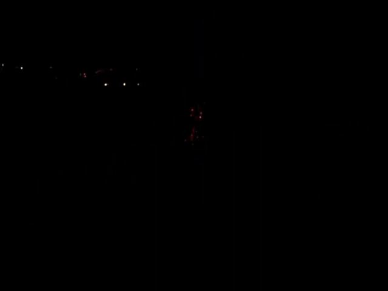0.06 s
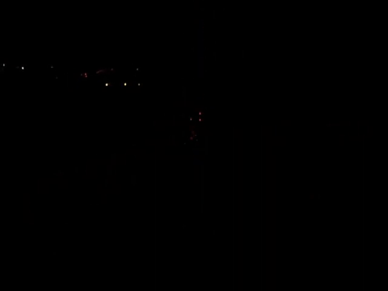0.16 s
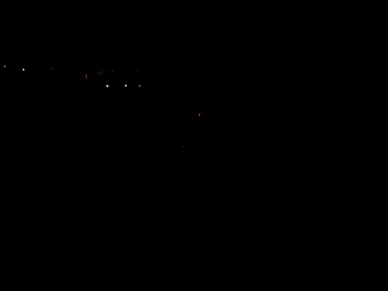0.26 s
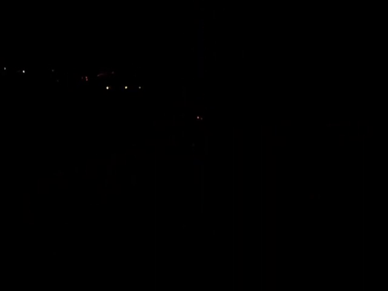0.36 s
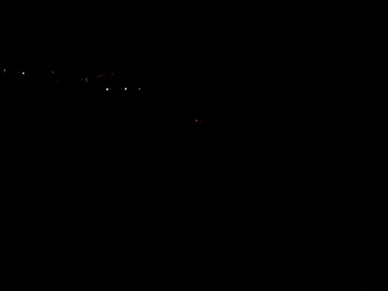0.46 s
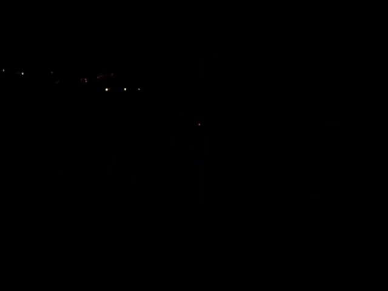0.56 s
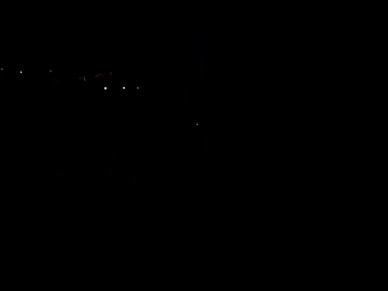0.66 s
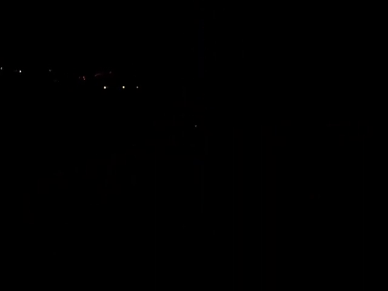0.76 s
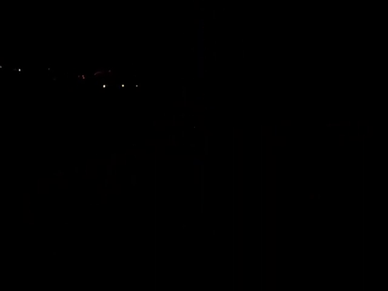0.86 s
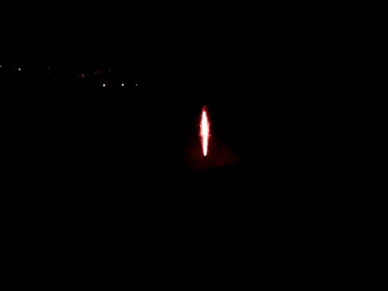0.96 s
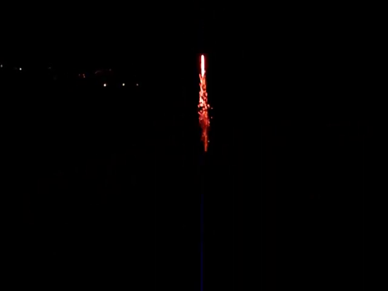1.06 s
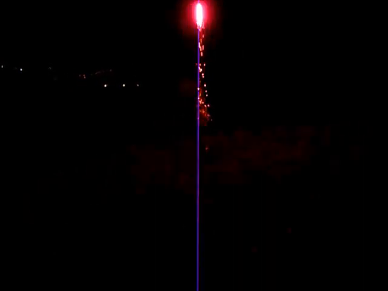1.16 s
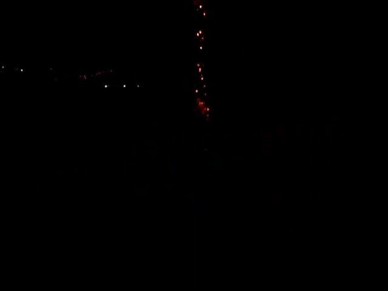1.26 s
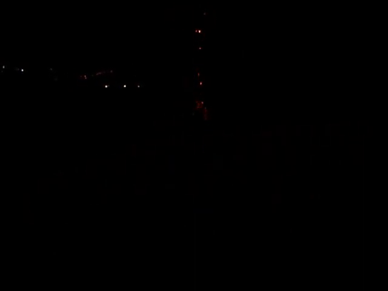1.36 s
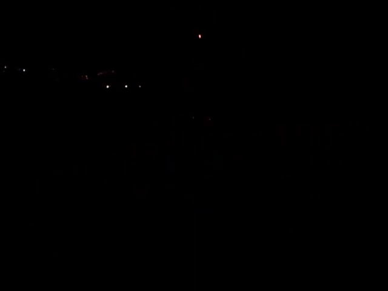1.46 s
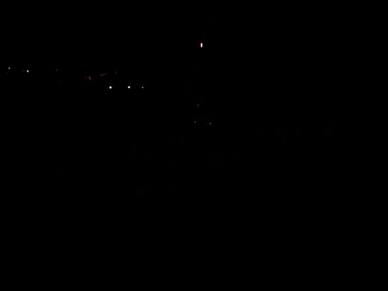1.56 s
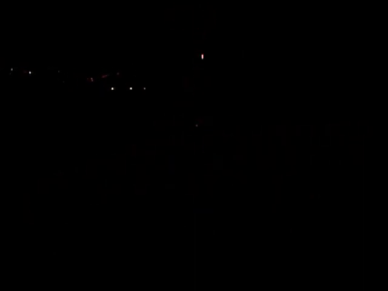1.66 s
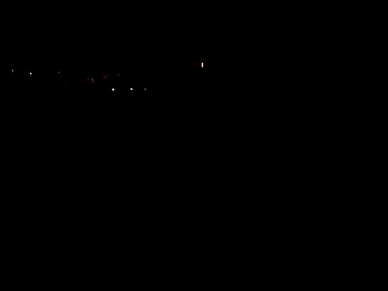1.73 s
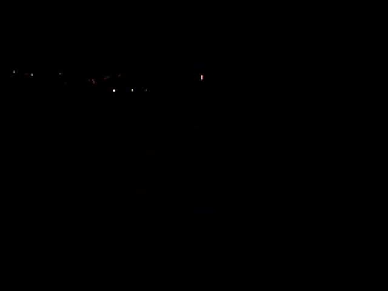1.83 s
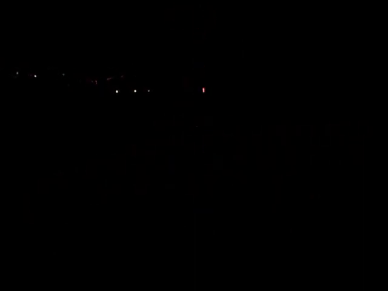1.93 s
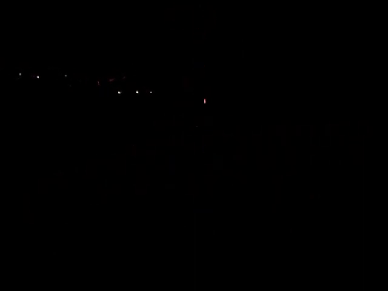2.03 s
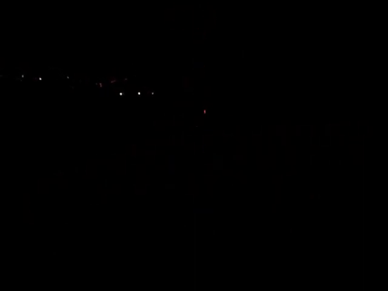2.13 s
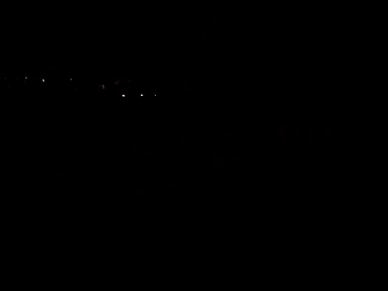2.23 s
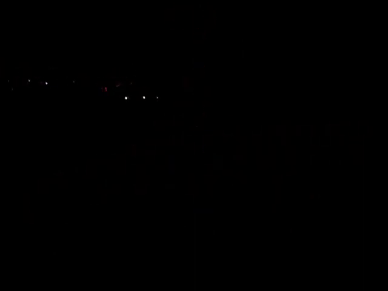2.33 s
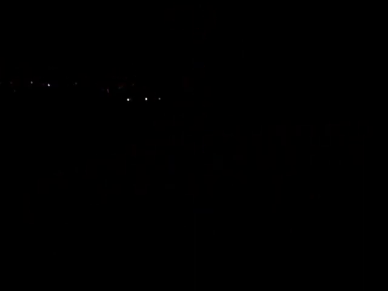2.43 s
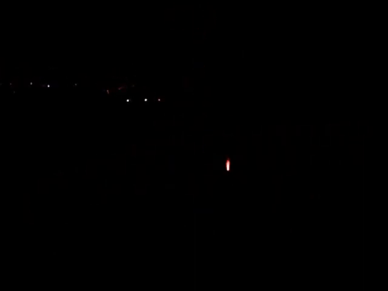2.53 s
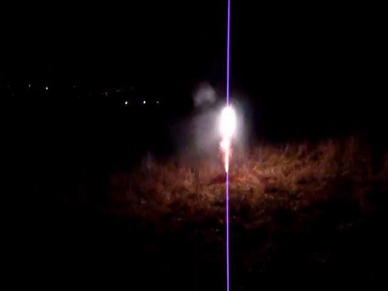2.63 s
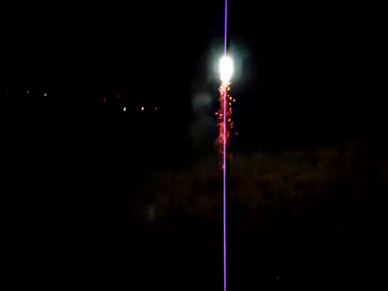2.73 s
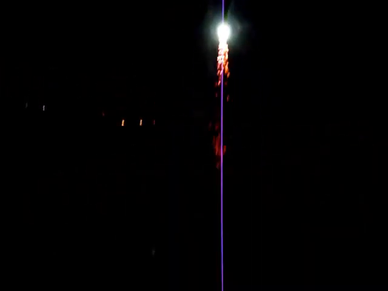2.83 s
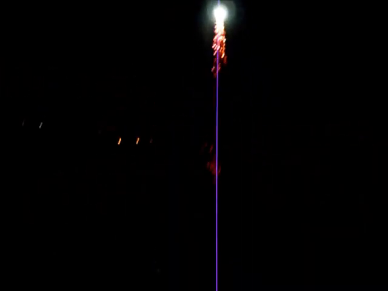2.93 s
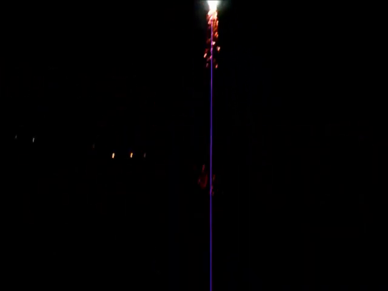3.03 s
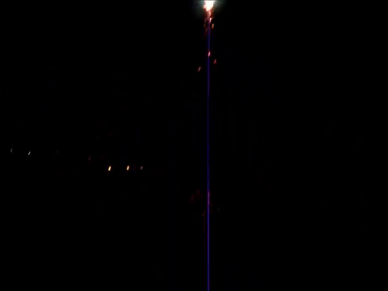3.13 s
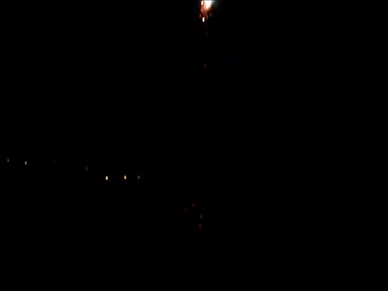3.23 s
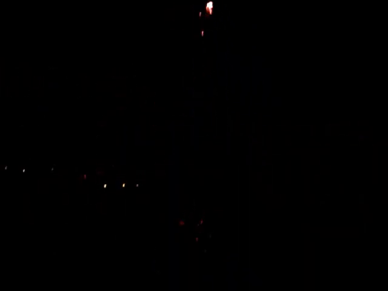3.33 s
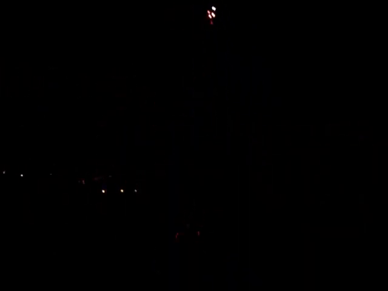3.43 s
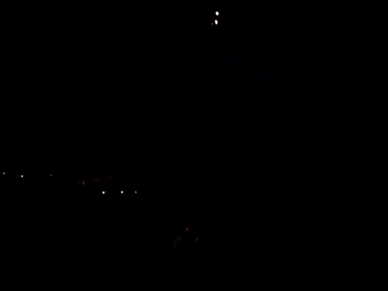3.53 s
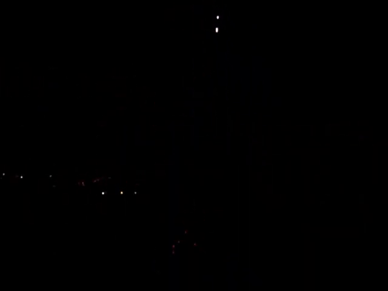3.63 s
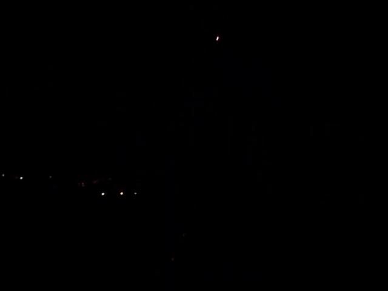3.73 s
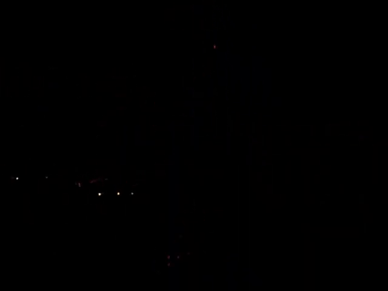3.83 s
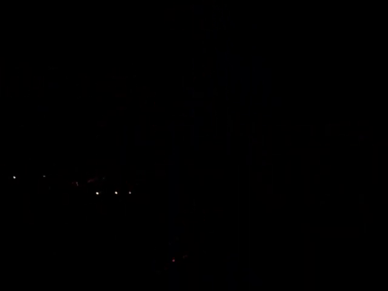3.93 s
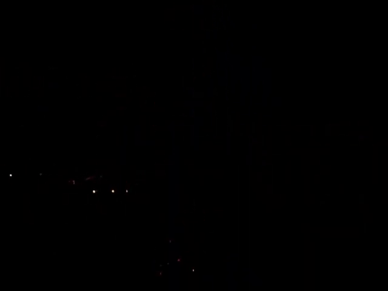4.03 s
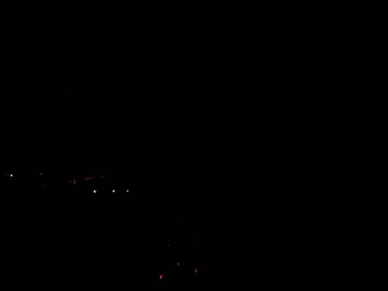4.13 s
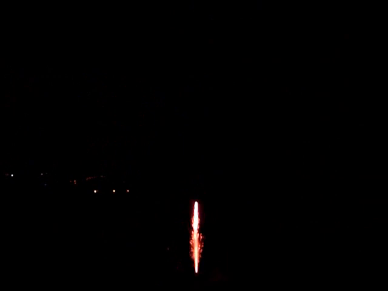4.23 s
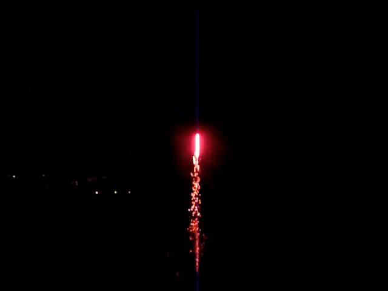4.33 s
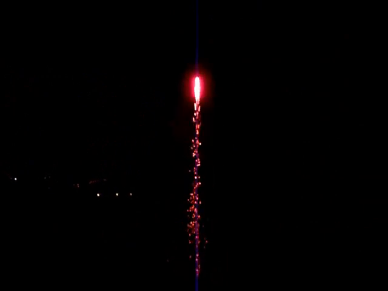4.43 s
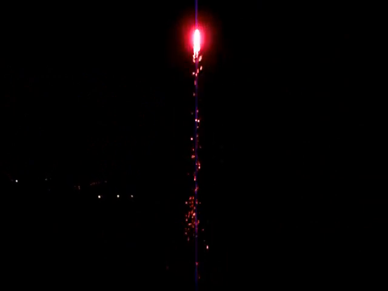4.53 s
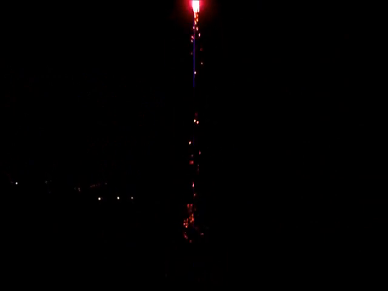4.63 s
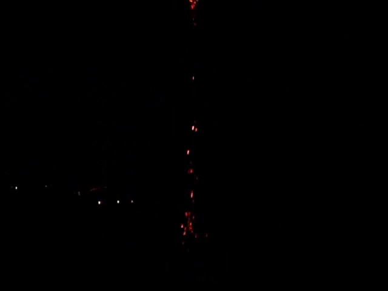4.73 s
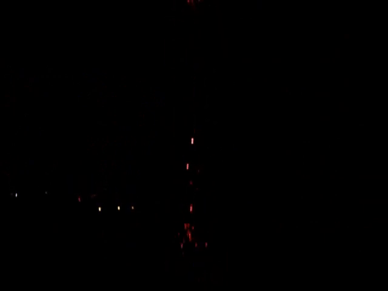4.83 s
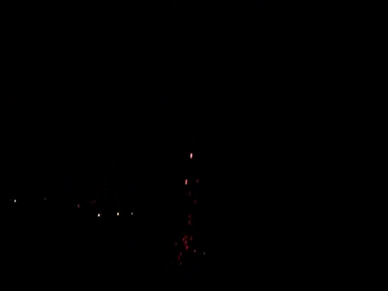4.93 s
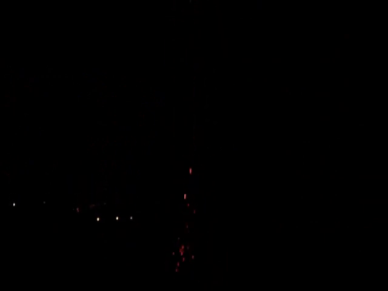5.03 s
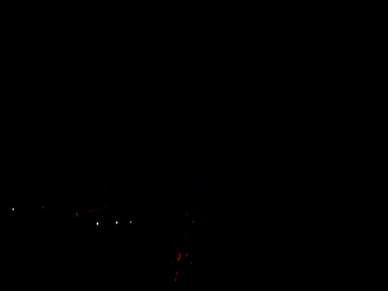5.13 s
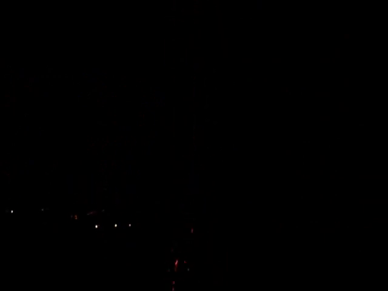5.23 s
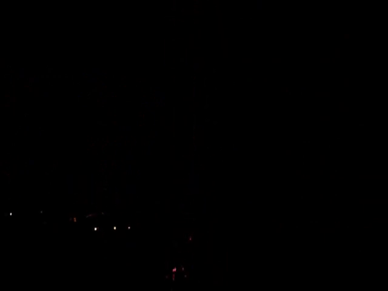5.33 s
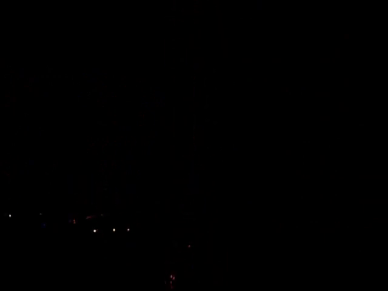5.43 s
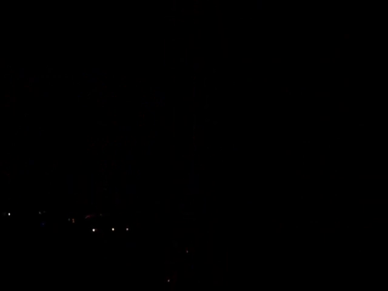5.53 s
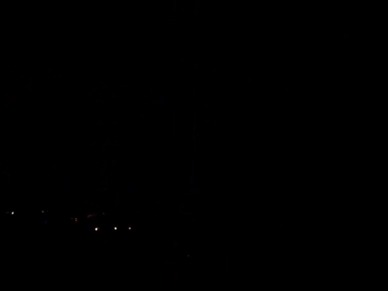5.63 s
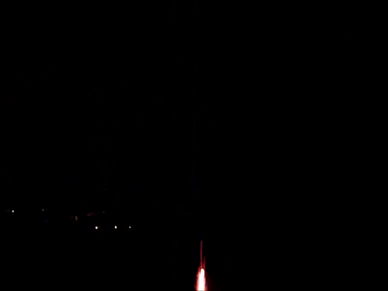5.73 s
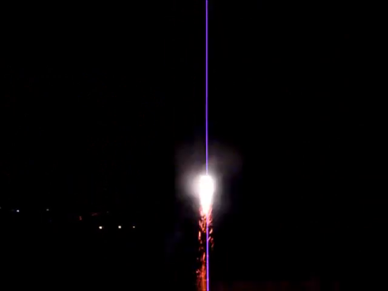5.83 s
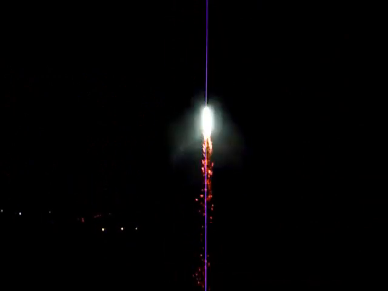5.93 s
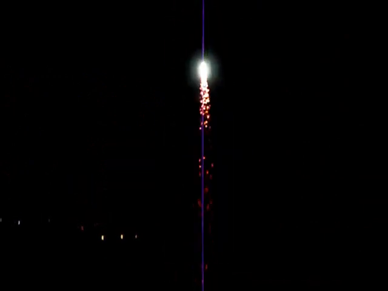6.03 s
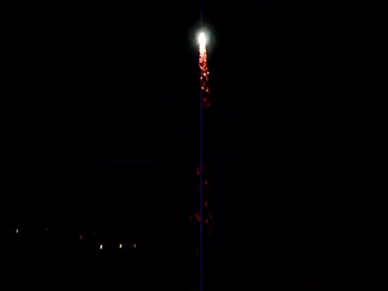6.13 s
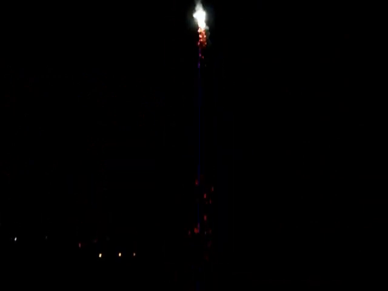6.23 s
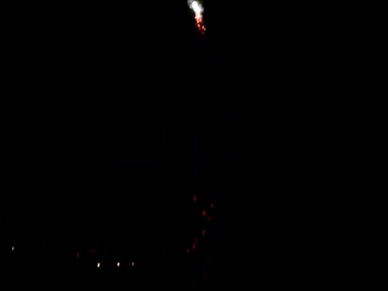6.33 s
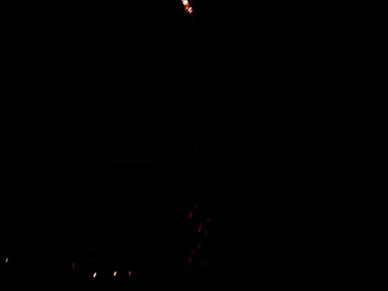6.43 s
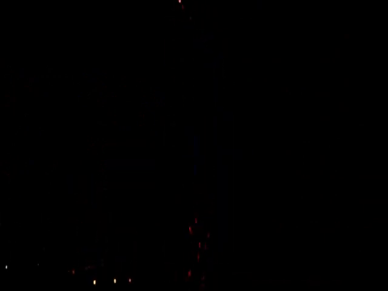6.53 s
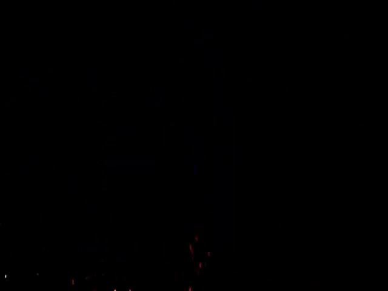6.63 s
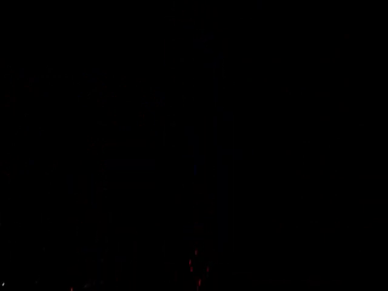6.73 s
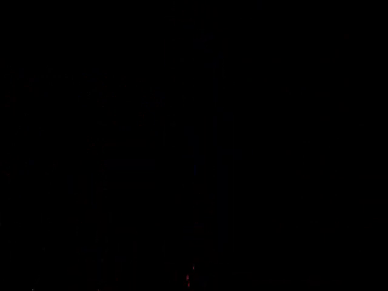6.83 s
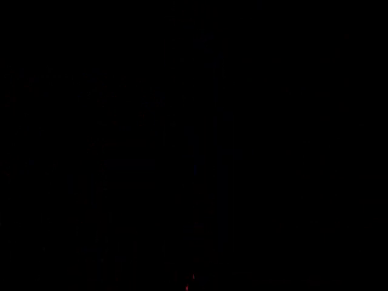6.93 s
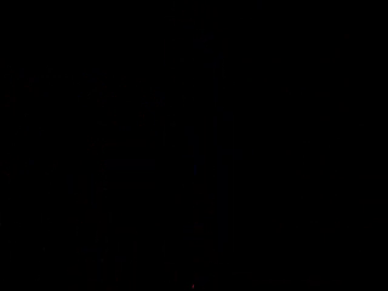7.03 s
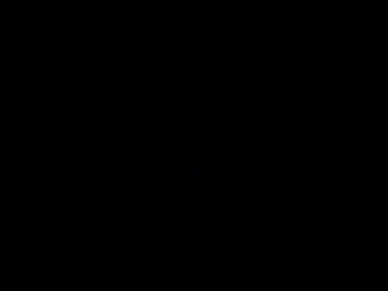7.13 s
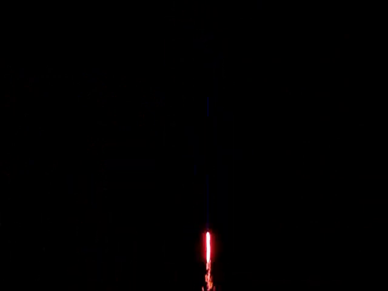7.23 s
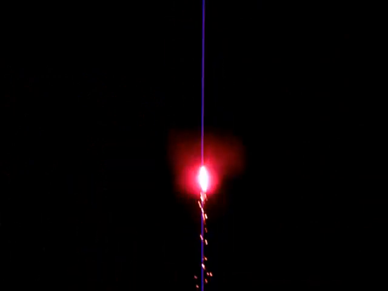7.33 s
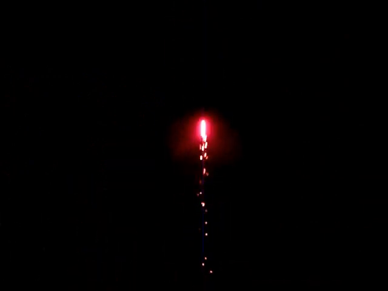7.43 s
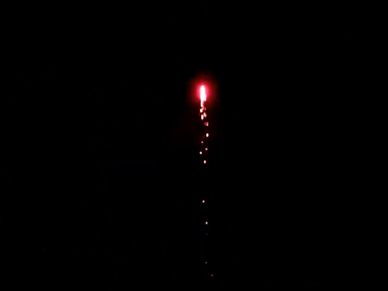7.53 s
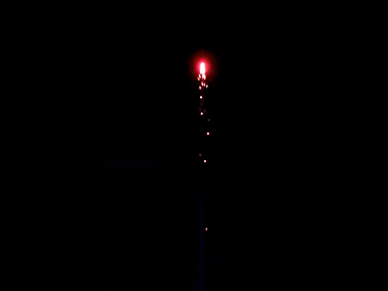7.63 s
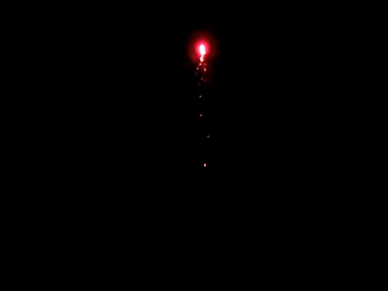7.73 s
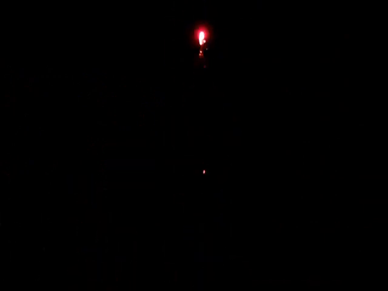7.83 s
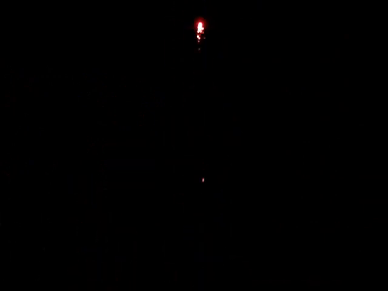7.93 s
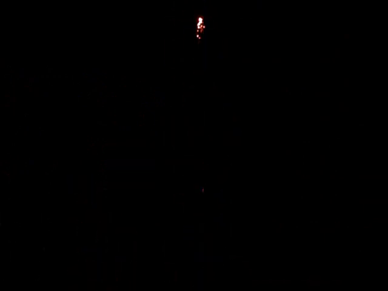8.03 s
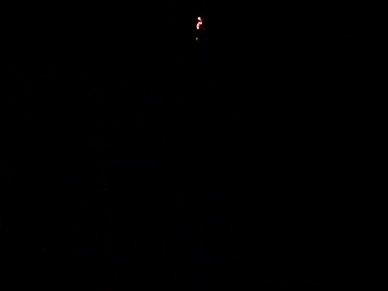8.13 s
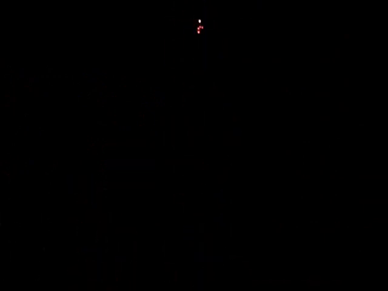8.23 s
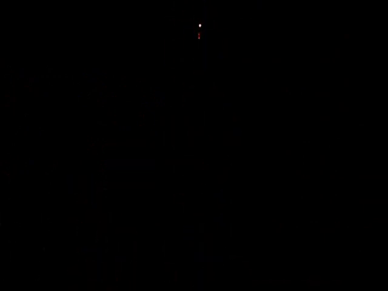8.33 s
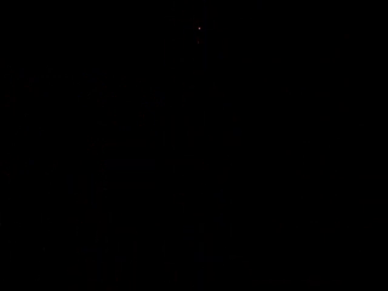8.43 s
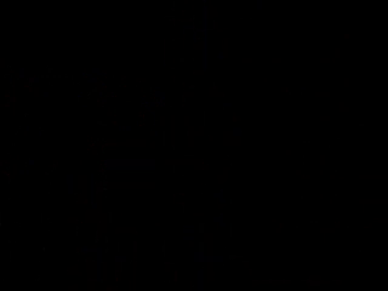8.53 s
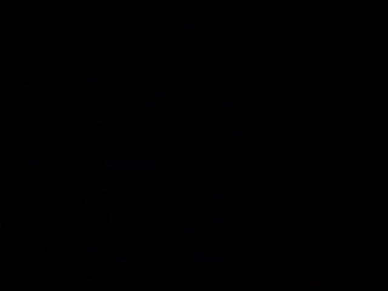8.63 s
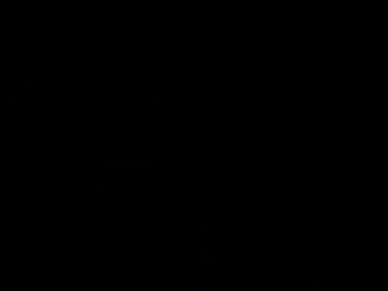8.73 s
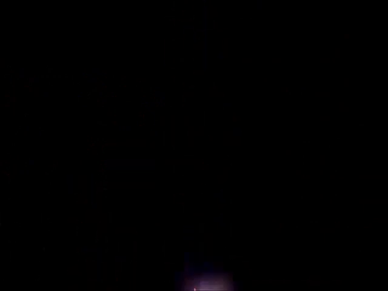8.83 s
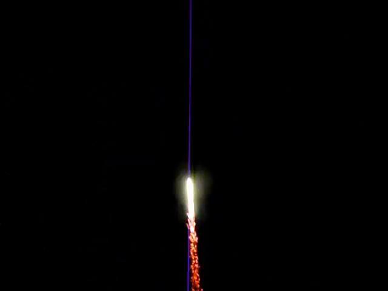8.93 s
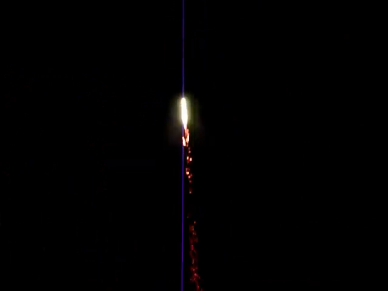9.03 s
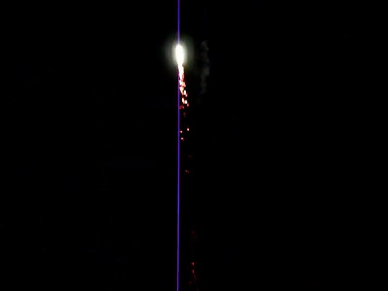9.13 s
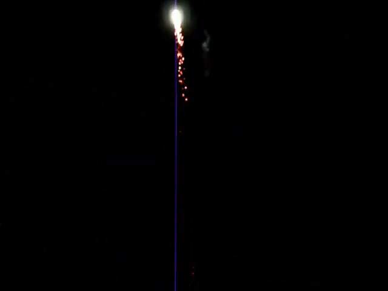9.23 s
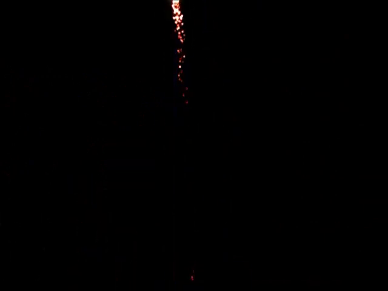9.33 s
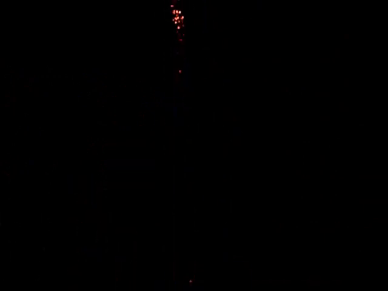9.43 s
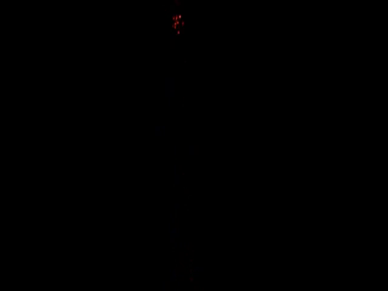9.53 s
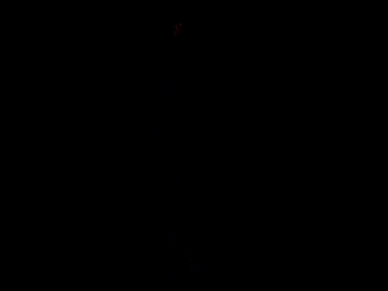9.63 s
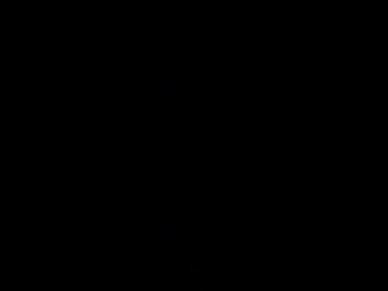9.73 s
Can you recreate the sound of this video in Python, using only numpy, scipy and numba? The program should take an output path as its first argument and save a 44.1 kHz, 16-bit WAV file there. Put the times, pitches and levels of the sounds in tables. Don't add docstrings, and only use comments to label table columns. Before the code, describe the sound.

A fading star fizzes over a quiet night hiss and low traffic murmur, then a burst of gas cracks from a tube nearby. Five more shots follow at steady intervals, dry and abrupt with a brief scattered tail. Between them come sizzling stars, fine crackle, breathy whistling from burning powder and light debris taps. The last shot is the sharpest. The sound is close stereo, with little deep bass and a dulled top.

```python
import sys
import numpy as np
from scipy import signal
from scipy.fft import rfft, irfft, next_fast_len
from scipy.io import wavfile
from scipy.ndimage import uniform_filter1d
from numba import njit

SR = 44100
rng = np.random.default_rng(int(sys.argv[2]) if len(sys.argv) > 2 else 0)


def int16_out(signal):
    q = np.round(np.clip(np.atleast_2d(signal).T, -1, 1) * 32767)
    wavfile.write(sys.argv[1], SR, q.astype(np.int16))


def field_ratio(decibels):
    return 10 ** (np.asarray(decibels, dtype=float) / 20)


N = 430416
SIZE = next_fast_len(N)
HZ = np.arange(SIZE // 2 + 1) * SR / SIZE + 1e-3
TIME = np.arange(N) / SR

# frequency_hz, level_db
NIGHT_COLOUR = [(18, -74), (30, -37), (162, -15.5), (328, -1.5), (857, -0.5), (1430, -3), (2350, -14.5),
                (3580, -12.5), (5990, -16), (7230, -23), (7750, -32), (8130, -55.5), (10600, -72),
                (17900, -120)]
# time_s, level_db
TRAFFIC_SWELL = [(0, -55), (.5, -57), (.85, -62), (1.2, -57), (1.9, -57), (2.45, -59), (2.75, -53),
                 (3.9, -59), (4.6, -53), (5.2, -55), (5.95, -53), (6.7, -61), (7.1, -51), (7.8, -62),
                 (8.5, -61), (8.9, -56), (9.76, -56)]
# frequency_hz, level_db
TRAFFIC_COLOUR = [(60, -47.5), (110, -21.5), (170, -23), (260, -1.5), (500, 3), (800, 1), (1100, -55.5)]
# start_s, length_s, level_db
ENGINE_REVS = [
    (.3, .8, -83),
    (1.45, .3, -82),
    (2.05, .3, -83),
    (3.2, .6, -88),
]
# shot_s, fully_alight_after_s, fizz_db, starts_dying_after_s, dying_db_per_s, spitting_db
STARS = [
    (-.66, .3, -52, .72, 24, -6),
    (.925, .25, -49, .9, 250, -3),
    (2.568, .22, -48.5, .47, 27, -10),
    (4.18, .38, -48.5, .9, 22, -3),
    (5.724, .18, -50, .5, 30, -8),
    (7.08, .27, -51.5, .8, 42, -3),
    (8.809, .12, -53, .5, 9, -8),
]
# start_s, length_s, fizz_db,
# depth_db (of the lower layers)
POWDER = [(0, .25, -70, 12), (.3, .3, -69, 4), (.68, .14, -68, 1.1), (1.9, .27, -66, 4),
          (2.34, .23, -59, -.5), (3.12, .22, -68, 9), (3.46, .13, -70, 4), (4.95, .15, -66, 8),
          (7.2, .3, -66, 8), (3.8, .38, -61, 1.5), (5.15, .2, -66, 6), (5.47, .25, -59, 2.5),
          (5.85, .27, -64, 9), (8.98, .3, -68, 9), (6.3, .15, -64, 7), (6.56, .1, -64, 8.5),
          (6.79, .14, -60, 4), (6.94, .14, -63.5, 5), (8.14, .26, -67, 2.5), (8.79, .02, -59, 1.5),
          (8.86, .07, -48, -4), (.9, .02, -60, 4)]
# frequency_hz, level_db
FIZZ_COLOUR = [(2800, -24), (3700, -19.5), (4500, 4), (5600, 10), (7100, 6.5), (7500, -3), (7800, -9),
               (8300, -40)]
# frequency_hz, level_db
BODY_COLOUR = [(1200, -17), (1600, 4), (2200, 4.5), (2900, 3.5), (4000, 3), (5200, -17), (7000, -60)]
# frequency_hz, level_db
ROAR_COLOUR = [(600, -26.5), (850, -1), (1100, -1), (1500, -5.5), (2100, -26), (3500, -64.5)]
# start_s, end_s, pitch_hz,
# width_hz, level_db
FLARES = [(0, .2, 2680, 200, -66), (.08, .52, 2670, 170, -66), (.4, .85, 2650, 220, -71),
          (.38, .9, 900, 70, -64), (1.401, 1.7, 960, 80, -64), (2.296, 2.55, 3270, 250, -67),
          (2.297, 2.547, 4850, 500, -65), (3.22, 3.62, 1300, 450, -59.5), (3.45, 3.8, 3200, 200, -72),
          (3.74, 4.18, 3250, 220, -63), (3.775, 4.17, 4770, 500, -68), (4.88, 5.15, 1450, 170, -58),
          (8.05, 8.4, 3650, 400, -71), (8.05, 8.4, 4550, 600, -71), (.45, .87, 5950, 300, -70),
          (7.291, 7.384, 4480, 2500, -52.5), (7.289, 7.38, 900, 700, -62), (8.078, 8.36, 1600, 350, -64),
          (8.49, 8.68, 1215, 280, -57), (8.541, 8.663, 640, 356, -57.5), (5.93, 6.67, 1100, 900, -57.5),
          (0, .35, 1100, 600, -63), (6.3, 7.0, 430, 350, -62), (4.35, 4.65, 3590, 250, -62),
          (9.338, 9.546, 1390, 300, -65)]
# peak_s, level_db, rise_ms, fall_ms, depth_db (more bass, less treble)
PUFFS = [(0.925, -19.5, 5.3, 22.4, -5), (.950, -28, 6.7, 10, -1), (.975, -31, 14, 7, 2),
         (0.999, -41, 11, 5, 8.5), (2.568, -23.5, 6.3, 26.7, 0.1), (2.586, -27.5, 12, 12, -1.1),
         (2.596, -33.5, 4, 6, 6), (2.621, -36.5, 10.5, 4, 6), (4.18, -22.5, 5.3, 14.6, -3),
         (4.210, -25, 17, 11.7, -2.5), (4.222, -29, 4, 5, 2.5), (4.235, -47, 6, 3, 11),
         (5.724, -23, 4.2, 17.5, -1.5), (5.752, -40.5, 5, 2.7, 1.1), (5.78, -31.5, 12, 15, 0.6),
         (7.08, -27.5, 6.5, 22, 0.1), (7.114, -43, 5.7, 6, 1.1), (7.132, -38.5, 15, 9.5, 2.1),
         (8.809, -19, 2.4, 8, -0.1), (8.813, -19.5, 1.5, 4, -1.5), (8.827, -33.5, 3, 10.5, 1.1),
         (8.848, -42, 2.5, 30, 7)]
# from_s, treble_db
BRIGHTNESS = [
    (.9, -3.5),
    (2.5, .5),
    (4.1, .1),
    (5.7, 2),
    (7.0, 1.5),
    (8.8, 2.5),
]
# frequency_hz, level_db
BLAST_COLOUR = [(24, -58.5), (40, -43), (271, 2.5), (422, -3.5), (787, 8.5), (1500, 1.5), (1870, 5.5),
                (2050, -1), (2620, 3), (6370, -5.5), (7440, -13.5), (8130, -50), (10600, -47.5),
                (17900, -120)]
# pitch_hz, width_hz, level_db
MUZZLE = [(760, 105, -9), (1170, 67, 2), (1700, 430, 1), (2610, 53, 3.5), (3090, 110, 5), (4500, 83, 6)]
# time_s, peak_db
CRACKS = [(0.9205, -17), (0.9222, -16), (0.9254, -12), (0.9273, -9), (0.9304, -10), (0.9325, -12),
          (0.9355, -14), (0.9374, -14), (0.9394, -15), (0.9442, -17), (0.9474, -18), (0.9496, -17),
          (0.951, -18), (0.953, -19), (0.9569, -19), (2.5691, -12), (2.5736, -12), (2.5763, -12),
          (2.5837, -14), (2.5912, -15), (2.5954, -17), (2.5968, -19), (2.5994, -20), (2.6025, -21),
          (2.6071, -21), (2.6227, -22), (4.1762, -18), (4.1781, -12), (4.1823, -12), (4.1867, -15),
          (4.1922, -18), (4.1957, -17), (4.1976, -17), (4.2023, -15), (4.2076, -14), (4.2097, -12),
          (4.2141, -15), (4.2206, -18), (4.2232, -20), (4.2278, -21), (4.2293, -23), (5.7192, -19),
          (5.7232, -13), (5.7284, -12), (5.7316, -13), (5.7339, -14), (5.7438, -21), (5.747, -22),
          (5.7526, -22), (7.0761, -21), (7.0828, -14), (7.0858, -15), (7.0886, -17), (7.0912, -20),
          (7.093, -19), (7.0967, -19), (7.1048, -24), (8.8084, -9), (8.8139, -6), (8.8182, -11)]
# start_s, end_s, pitch_hz, width_hz, level_db
BARKS = [(.921, .936, 2620, 606, -36), (.926, .937, 845, 300, -31), (2.564, 2.580, 800, 300, -25),
         (2.580, 2.590, 2220, 600, -28.5), (4.178, 4.188, 2850, 600, -30.5), (4.200, 4.218, 750, 250, -29),
         (5.719, 5.727, 3120, 300, -33.5), (5.725, 5.732, 4500, 350, -26), (7.078, 7.089, 4250, 700, -29),
         (8.807, 8.817, 4600, 900, -22), (8.809, 8.816, 1320, 250, -30), (8.808, 8.822, 575, 150, -31),
         (8.806, 8.818, 915, 150, -32), (8.806, 8.817, 3290, 300, -27), (8.842, 8.875, 1050, 500, -43),
         (.925, .945, 1720, 200, -33), (.96, .985, 1300, 500, -39), (2.566, 2.578, 1910, 300, -30),
         (2.578, 2.598, 4670, 350, -36), (2.586, 2.598, 5700, 400, -38), (4.177, 4.19, 5820, 400, -34),
         (4.195, 4.222, 3070, 300, -32), (4.205, 4.222, 5800, 500, -36), (4.178, 4.187, 760, 300, -30),
         (5.727, 5.737, 1400, 600, -34), (5.778, 5.79, 2800, 500, -39), (5.778, 5.79, 1000, 300, -38),
         (7.078, 7.092, 3560, 300, -33), (7.078, 7.095, 920, 200, -33)]
# time_s, peak_db, pitch_hz, ring_t60_ms
THUMPS = [
    (0.926, -27.5, 237, 34),
    (2.566, -53, 323, 51),
    (5.725, -22, 300, 40),
    (7.079, -34, 296, 44),
    (8.81, -23, 325, 45),
    (8.812, -21, 220, 28),
]
# time_s, peak_db, pitch_hz, ring_t60_ms
KNOCKS = [(1.0309, -25, 870, 8), (1.0443, -28, 657, 8), (1.1315, -36, 800, 6), (4.6805, -37, 600, 7),
          (4.6897, -30, 650, 7), (4.7712, -38, 550, 7), (5.2394, -38, 550, 8), (5.3478, -35.5, 800, 7),
          (5.352, -35, 750, 8), (6.119, -37, 600, 6), (6.1397, -24, 650, 5.5), (6.3262, -30, 1230, 7),
          (6.413, -40, 563, 8), (6.5847, -39, 1400, 6), (6.6605, -37, 1250, 8), (8.6888, -38, 1045, 14),
          (1.0311, -28, 4720, 7), (1.0444, -34, 3930, 6), (6.3257, -25.5, 3700, 3.5),
          (6.3262, -31, 2300, 4), (6.9406, -35, 1920, 5), (6.9406, -38, 2900, 4), (8.6882, -42, 2410, 6),
          (1.8265, -37, 5200, 6), (1.8285, -38, 6800, 6), (6.5592, -41, 5500, 4), (7.7162, -39, 5800, 4),
          (1.7585, -38, 5600, 4)]
# time_s, peak_db
SPARKS = [(1.2244, -33), (1.3114, -34), (1.3317, -34), (1.3658, -34), (1.3883, -34), (1.4134, -34),
          (1.4719, -35), (1.5118, -34), (1.6002, -32), (1.6175, -36), (1.6271, -33), (1.6546, -35),
          (1.6601, -38), (1.6921, -35), (1.7191, -33), (1.7298, -36), (1.7621, -34), (1.7771, -28),
          (1.7918, -35), (1.8002, -34), (1.8087, -41), (1.8269, -35), (1.8324, -43), (1.8425, -41),
          (3.6861, -45), (4.5085, -32), (4.575, -32), (4.5881, -27), (4.6256, -31), (4.6649, -33),
          (4.7343, -35), (4.8112, -35), (4.8163, -35), (4.8746, -31), (4.9402, -34), (4.9876, -34),
          (5.0026, -33), (5.045, -30), (5.0821, -32), (5.1027, -31), (6.4399, -38), (7.59, -30),
          (7.6465, -34), (7.654, -35), (7.8027, -38), (7.832, -36), (7.8655, -35), (7.9106, -33),
          (7.9224, -39), (7.9386, -38), (7.9628, -38), (7.9732, -42), (7.992, -43), (8.027, -42),
          (8.4215, -49), (8.6888, -41), (9.3788, -39), (9.4329, -42), (9.5763, -42), (9.67, -44)]
# frequency_hz, level_db
SPARK_COLOUR = [(600, -43), (1500, -3), (3000, -2), (5500, 2), (7200, -1), (7800, -18), (8200, -61)]
# frequency_hz, likeness (0 to 1)
LIKENESS = [(60, .85), (200, .97), (700, .81), (1150, .7), (1700, .5), (3300, .36), (5700, .45),
            (7200, .75), (7900, .2)]
# frequency_hz, lead_radians
LEAD = [(100, .05), (350, .25), (700, .55), (1150, .75), (2400, .95), (3300, .9), (4400, .45), (7100, -.15)]
# frequency_hz, tilt_db
TILT = [(60, .1), (180, 1.4), (700, 1.3), (1150, .8), (1700, -.5), (2600, -2.5), (4400, -1.6), (7680, -.7)]

DIRECT_SIDE_DB = -12


def on_hz(points):
    hz, value = np.transpose(points)
    return np.interp(np.log(HZ), np.log(hz + 1), value)


def bell(hz, width_hz):
    return 1 / np.sqrt(1 + ((HZ - hz ** 2 / HZ) / width_hz) ** 2)


def colour(x, gain):
    return irfft(rfft(x, SIZE) * gain / np.sqrt(np.mean(gain ** 2)), SIZE)[..., :N]


def hiss():
    return rng.standard_normal((2, N))


def widen(sound, side_db):
    return sound * [[1], [field_ratio(side_db)]]


def grit(rate, scatter_db):
    odds = np.minimum(rng.exponential(size=N), 3)
    hits = rng.random(N) < rate / SR
    size = uniform_filter1d(field_ratio(scatter_db * odds) * hits, size=9)
    return hiss() * size / np.sqrt(np.mean(size ** 2))


def walk(rate):
    hold = int(SR / rate)
    steps = np.repeat(rng.standard_normal(N // hold + 1), hold)
    return 1.3 * uniform_filter1d(uniform_filter1d(steps, hold), hold)[:N]


def spells(rows, edge_db_per_s, floor_db):
    power = field_ratio(2 * floor_db)
    for start, length, db in rows:
        outside_s = np.maximum(np.maximum(start - TIME, TIME - start - length), 0)
        power = power + field_ratio(2 * (db - edge_db_per_s * outside_s))
    return np.sqrt(power)


@njit
def moving_bandpass(x, hz, width):
    y, band, low = np.empty(len(x)), 0., 0.
    for i in range(len(x)):
        g, k = np.tan(np.pi * hz[i] / SR), width / hz[i]
        v = (band + g * (x[i] - low)) / (1 + g * (g + k))
        band, low, y[i] = 2 * v - band, low + 2 * g * v, k * v
    return y


def tube(rows, sag, taper, side_db, waver=0):
    out = np.zeros((2, N))
    drift, flutter = 1 + waver * walk(14), field_ratio(60 * waver * walk(22))
    for start, end, hz, width_hz, db in rows:
        first, size = int(max(start, 0) * SR), int((end - start) * SR)
        centre = np.linspace(hz, hz * (1 - sag), size) * drift[first:first + size]
        air = rng.standard_normal((2, size))
        for _ in range(2):
            air = np.array([moving_bandpass(x, centre, 1. * width_hz) for x in air])
        swell = signal.windows.tukey(size, min(taper, 1))
        out[:, first:first + size] += field_ratio(db) * swell * air / np.std(air)
    return widen(out * flutter, side_db)


def rings(rows, rough, onset_ms):
    out, t = np.zeros((2, N + 4000)), TIME[:4000]
    for s, db, hz, t60_ms in rows:
        shape = field_ratio(db - 60000 * t / t60_ms) * (1 - np.exp(-1000 * t / onset_ms))
        grain = 1 + rough * uniform_filter1d(rng.standard_normal((2, len(t))), size=5)
        ring = shape * np.sin(2 * np.pi * hz * t) * grain
        out[:, int(s * SR):][:, :len(t)] += widen(ring, DIRECT_SIDE_DB)
    return out[:, :N]


def snaps(rows, length_ms, more_db, bounce_db, spectrum):
    bounce_ms, bounce_t60_ms = 2.4, 14
    out, t = np.zeros((2, N)), TIME[:600]
    front = np.linspace(1, -1, int(length_ms * SR / 1000))
    late_ms = 1000 * t - bounce_ms
    bounce = field_ratio(bounce_db - 60 * late_ms / bounce_t60_ms) * (late_ms > 0)
    for s, db in rows:
        snap = rng.standard_normal((2, len(t))) * bounce
        snap[:, :len(front)] = front * np.sign(rng.standard_normal((2, 1)))
        first = int(s * SR) - len(front) // 2
        out[:, first:][:, :len(t)] += widen(field_ratio(db + more_db) * snap, DIRECT_SIDE_DB)
    return colour(out, field_ratio(on_hz(spectrum)))


def night():
    floor = field_ratio(-58 + .8 * walk(14)) * colour(hiss(), field_ratio(on_hz(NIGHT_COLOUR)))
    swell_db = np.interp(TIME, *np.transpose(TRAFFIC_SWELL)) - 4.5
    swell = field_ratio(swell_db + 2.0 * walk(9) + 1.2 * walk(25))
    traffic = swell * colour(hiss(), field_ratio(on_hz(TRAFFIC_COLOUR)))
    hum_hz, width_hz = 133.2, 4.3
    hum = spells(ENGINE_REVS, 60, -96) * colour(hiss(), bell(hum_hz, width_hz) ** 2)
    return floor + traffic + hum


def powder(deep, more_db, ember_db):
    rows = [(s, length, db + deep * depth_db + more_db) for s, length, db, depth_db in POWDER]
    return spells(rows, 170, ember_db)


def burning():
    stars = np.array(STARS)
    latest = np.searchsorted(stars[:, 0], TIME) - 1
    shot, alight, db, dying, dying_db_per_s, spit_db = stars[latest].T
    age = TIME - shot
    lit_db = db - dying_db_per_s * np.maximum(age - dying, 0)
    fizz = lit_db - np.where(age < alight, 24 * (alight - age), 7.5 * (age - alight))
    body = lit_db - 1.8 - 7.5 * age
    roar = lit_db - 6 - 6 * age
    below = powder(0, 0, -73), powder(1, 0, -73), powder(1, -5, -65)
    levels = [10 * np.log10(field_ratio(2 * a) + b ** 2) for a, b in zip((fizz, body, roar), below)]
    crackle = -10.5 + spit_db + 6 * np.minimum(age, dying)
    return *levels, crackle


def star():
    fizz_db, body_db, roar_db, crackle_db = burning()
    spitting = field_ratio(crackle_db) * grit(900, 5.0)
    burn = (hiss() + spitting) / np.sqrt(1 + field_ratio(2 * crackle_db)) * field_ratio(.7 * walk(30))
    fizz = colour(burn * field_ratio(fizz_db - 1.03), field_ratio(on_hz(FIZZ_COLOUR)))
    body = colour(burn * field_ratio(body_db - 1.0), field_ratio(on_hz(BODY_COLOUR)))
    roar = colour(hiss() * field_ratio(roar_db - 2.5 + 0.63 * walk(12)), field_ratio(on_hz(ROAR_COLOUR)))
    return widen(fizz + body, -5) + roar


def flares():
    return tube(FLARES, .015, 0.55, -3, waver=.011)


def ground_return(direct):
    t60_s, level_db = 0.23, -18
    t = TIME[:SR // 2]
    tail = rng.standard_normal((2, len(t))) * field_ratio(-60 * t / t60_s) * (t > .012)
    tail = widen(tail * field_ratio(level_db) / np.sqrt(np.sum(tail[0] ** 2)), -7)
    return signal.fftconvolve(direct[:1], tail, axes=1)[:, :N]


def lift_charges():
    muzzle_db = sum(db * bell(hz, width) ** 2 for hz, width, db in MUZZLE)
    gain = field_ratio(on_hz(BLAST_COLOUR) + muzzle_db)
    jet = rfft(hiss() + .35 * grit(2000, 3.0), SIZE) * gain / np.sqrt(np.mean(gain ** 2))
    flow = np.zeros((3, N))
    for s, db, rise_ms, fall_ms, depth_db in PUFFS:
        bright_db = [treble_db for start, treble_db in BRIGHTNESS if start < s][-1]
        span = slice(int((s - .05) * SR), int((s + .3) * SR))
        bands = [(depth_db, 2.5), (0, 0), (bright_db - .1 * depth_db, 0)]
        for band, (band_db, late_ms) in enumerate(bands):
            ms = (TIME[span] - s) * 1000 - late_ms
            puff = np.exp(2 * np.where(ms < 0, ms / rise_ms, -ms / fall_ms))
            flow[band, span] += field_ratio(2 * (db + band_db)) * puff
    bass, treble = 1 / (1 + (HZ / 1300) ** 4), 1 - 1 / (1 + (HZ / 3700) ** 6)
    shares = (bass, 1 - bass - treble, treble)
    direct = sum(np.sqrt(f) * irfft(jet * share, SIZE)[:, :N] for f, share in zip(flow, shares))
    return widen(direct, DIRECT_SIDE_DB) + ground_return(direct)


def cracks():
    return snaps(CRACKS, .17, -9, -22, BLAST_COLOUR)


def barks():
    return tube(BARKS, .06, 0.78, DIRECT_SIDE_DB)


def thumps():
    return signal.sosfilt(signal.butter(4, 130, "high", fs=SR, output="sos"), rings(THUMPS, .05, 3.3))


def knocks():
    struck = rings([(s + .0007, *rest) for s, *rest in KNOCKS], 0.35, 0.15)
    return signal.sosfilt(signal.butter(4, [260, 7000], "band", fs=SR, output="sos"), struck)


def lone_sparks():
    return snaps(SPARKS, .12, -2.5, -11.5, SPARK_COLOUR)


def ports(sound):
    common, differing = rfft(sound, SIZE)
    alike = np.clip(on_hz(LIKENESS), 0, 1)
    common = common * np.sqrt((1 + alike) / 2)
    differing = differing * np.sqrt((1 - alike) / 2)
    skew = field_ratio(on_hz(TILT) / 2) * np.exp(.5j * on_hz(LEAD))
    left, right = (common + differing) * skew, (common - differing) / skew
    return 1.348 * irfft(np.array([left, right]), SIZE)[:, :N]


def scene():
    burn = star() + flares() + lone_sparks()
    shots = lift_charges() + cracks() + barks() + thumps()
    return ports(night() + burn + shots + knocks())


def band_limit(x):
    return signal.sosfilt(signal.butter(12, 8280, fs=SR, output="sos"), x)


def record(dry):
    top = signal.sosfilt(signal.ellip(10, .2, 80, 7800, fs=SR, output="sos"), dry)
    band = signal.sosfilt(signal.butter(2, 110, "high", fs=SR, output="sos"), top)
    mix = band + field_ratio(-99) * rng.standard_normal(dry.shape)
    return band_limit(mix)


dry = scene()
out = record(dry)
int16_out(out)
```